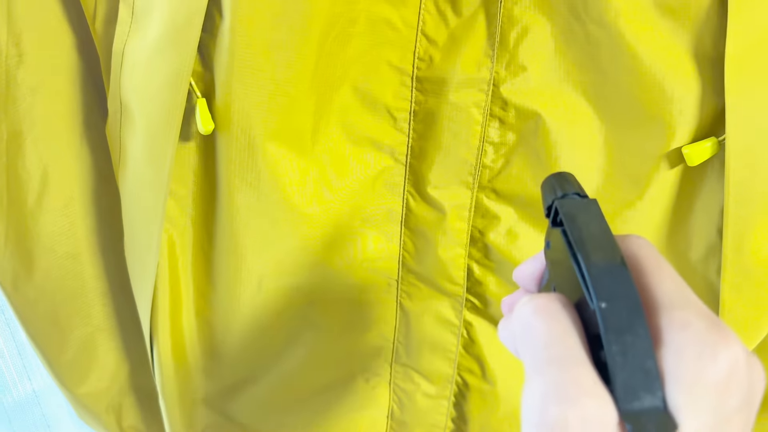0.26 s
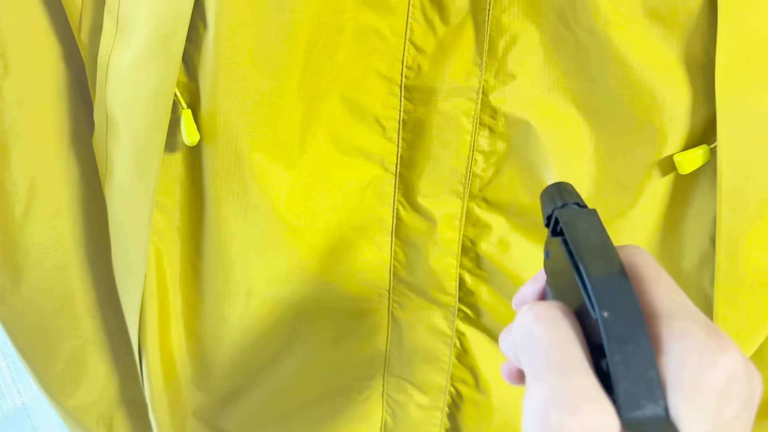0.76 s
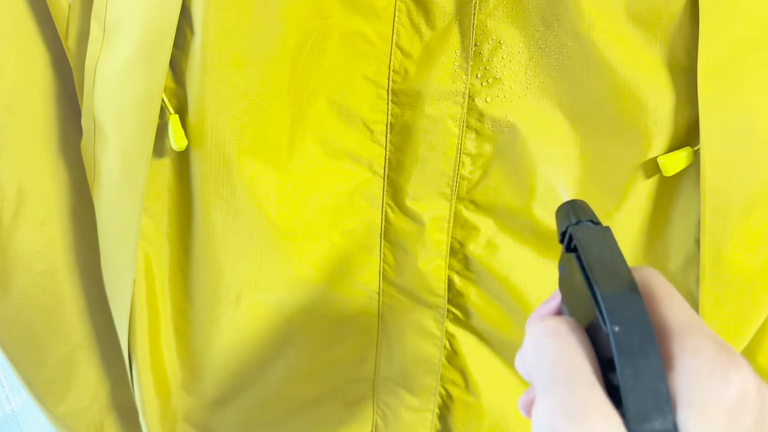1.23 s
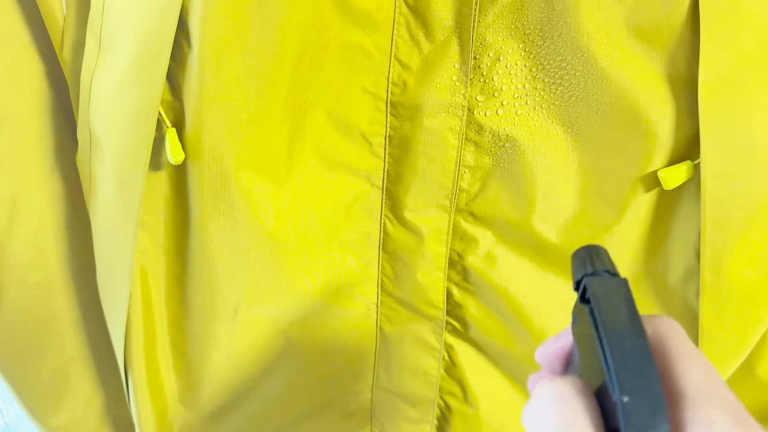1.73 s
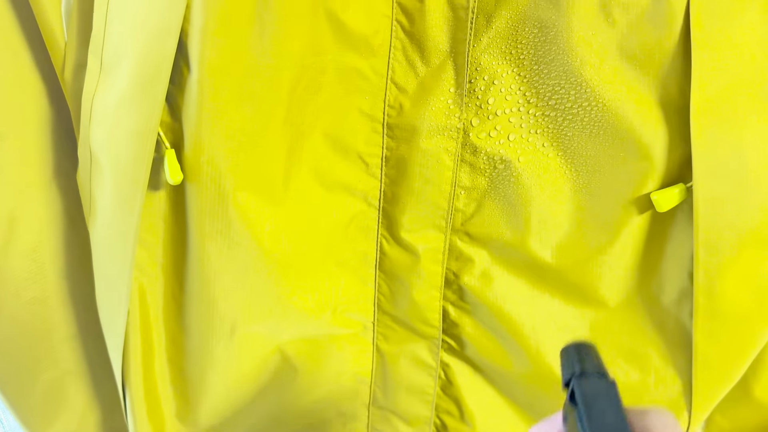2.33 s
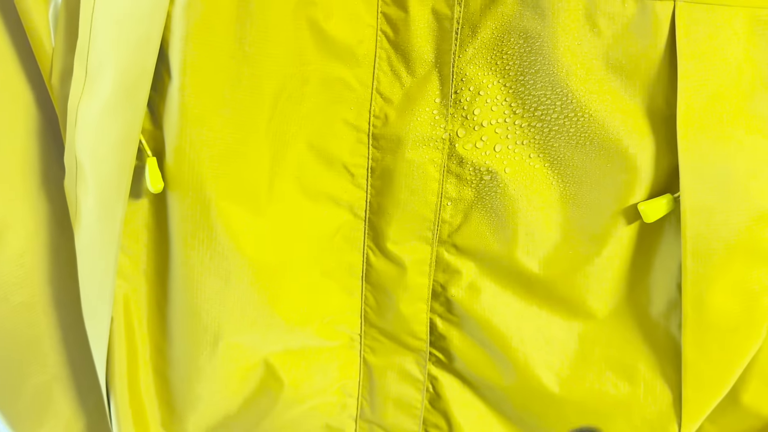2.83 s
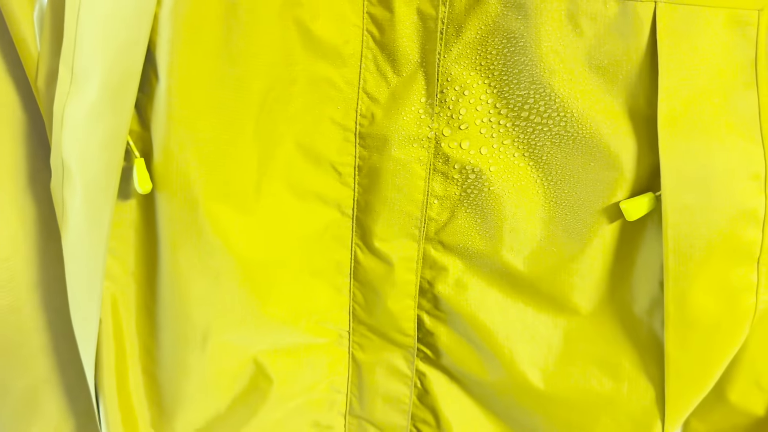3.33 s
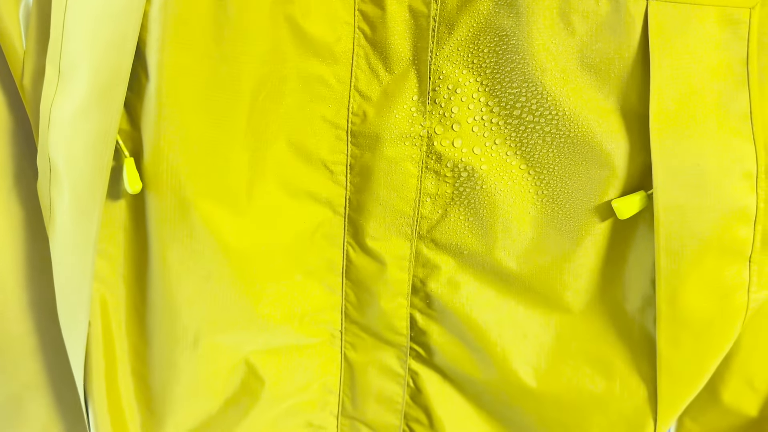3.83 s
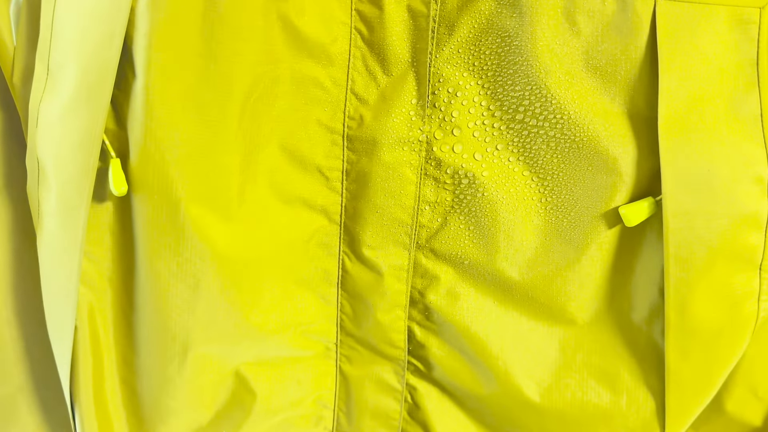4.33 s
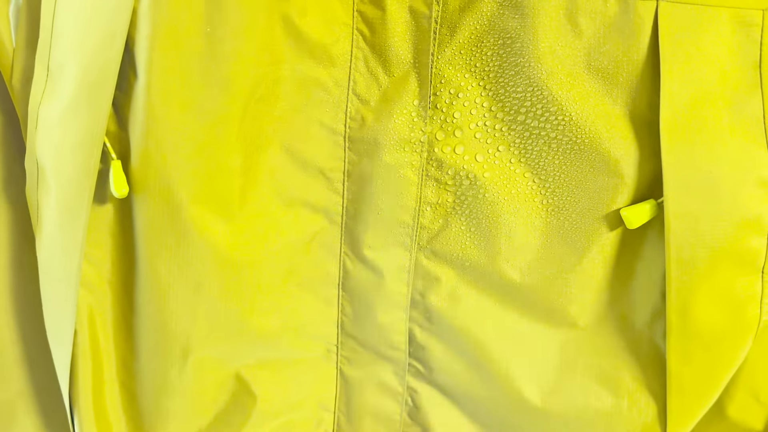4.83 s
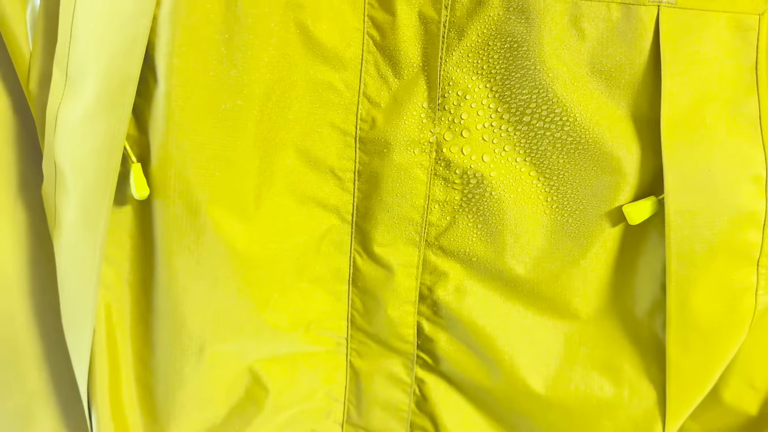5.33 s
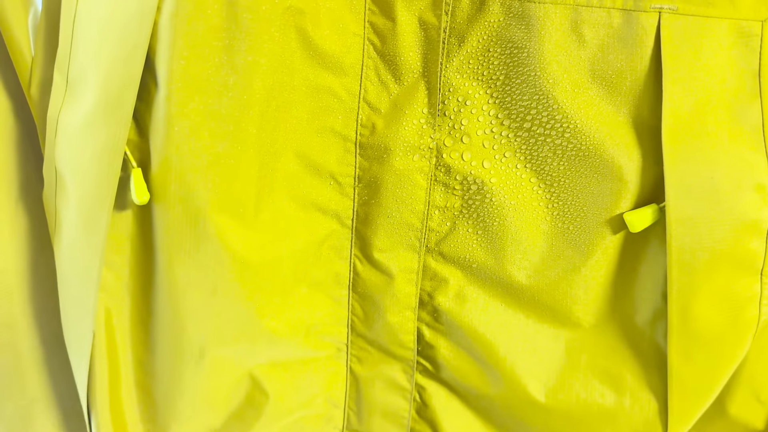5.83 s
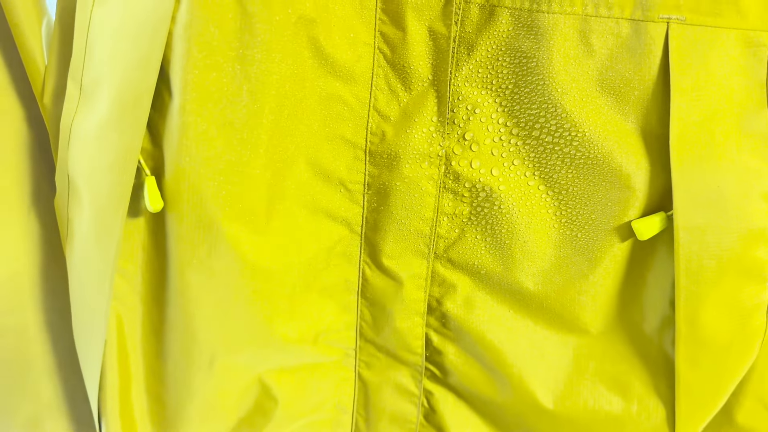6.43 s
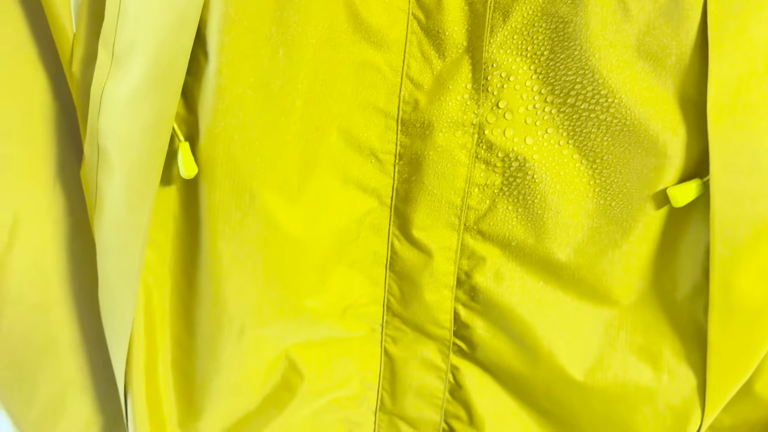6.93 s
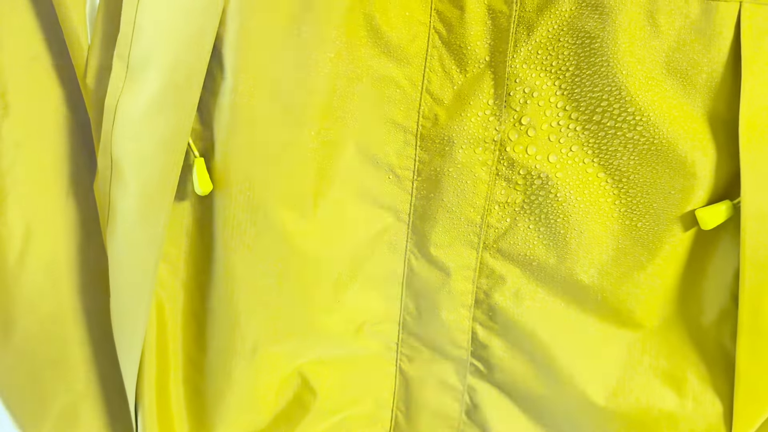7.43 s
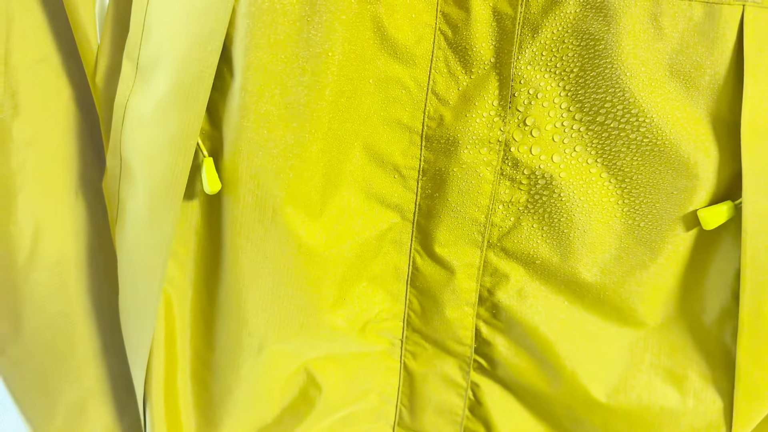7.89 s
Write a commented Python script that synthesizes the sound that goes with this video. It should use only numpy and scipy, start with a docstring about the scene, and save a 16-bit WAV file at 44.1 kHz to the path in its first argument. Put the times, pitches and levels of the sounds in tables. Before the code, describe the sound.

A plastic trigger spray bottle hisses water onto a nylon jacket in short, repeated bursts, with small clicks and pattering droplets.

```python
"""Spraying a nylon jacket

A plastic trigger sprayer is pulled eleven times over a jacket, close to a phone in a small room.
The pump clicks, the nozzle hisses and droplets patter on the cloth; after most pulls the trigger
ticks back. The first pulls sputter and spit on trapped air. A low rumble, like traffic outside,
swells towards the end, and a soft hiss rises after the ninth pull."""
import sys
import numpy as np
from scipy import signal
from scipy.fft import rfft, irfft
from scipy.io import wavfile
from scipy.ndimage import uniform_filter1d

SR = 44100
rng = np.random.default_rng(int(sys.argv[2]) if len(sys.argv) > 2 else 0)


def materialize(psi):
    """Save the field psi as 16-bit PCM at rate SR to the path in sys.argv[1].

    A 1-D psi becomes a single channel; in a 2-D psi each row is a channel.
    """
    bounded = np.clip(np.atleast_2d(psi).T, -1, 1)
    quanta = np.round(bounded * 32767).astype(np.int16)
    wavfile.write(sys.argv[1], SR, quanta)


N = 359718
TIME = np.arange(N) / SR
FREQ = np.maximum(np.arange(N // 2 + 1) * SR / N, 1)

# How the left and right microphones differ for nearby sounds.
MIC_BALANCE = [(500, 5), (1300, 3), (1850, 7.5), (2600, -1.5), (3800, 0), (5100, 4.5), (6900, 5), (7700, 8),
               (8800, 0.5), (13000, 0.1)]  # freq_hz, left_minus_right_db
MIC_LIKENESS = [(300, 0.27), (1000, 0.91), (1800, 0.68), (2400, 0.24), (2900, 0.84), (4500, 0.55),
                (6500, 0.37), (8000, 0.57), (9400, 0.97), (11000, 0.51), (13000, 0.37), (15500, 0.87)]  # freq_hz, correlation (1 means alike)
MIC_LEAD = [(300, .05), (1000, -.15), (1800, -.65), (2200, -1.4), (2500, .5), (4000, 1.1), (5200, .6),
            (6300, -.7), (7400, -3.0), (9800, -3.3), (12000, -4.3), (15500, -6.0)]  # freq_hz, left_lead_radians

# The colour of each sound, from bass to treble: freq_hz, gain_db
ROOM_COLOUR = [(25, -14.5), (42, 0), (60, 3), (100, 3.5), (280, -2), (600, -13), (850, -15.5),
               (1300, -20.5), (2200, -15), (3500, -31), (7500, -21.5), (9500, -41), (12000, -33),
               (16000, -44.5)]
HISS_COLOUR = [(400, -15), (1000, -10), (1800, 8), (3300, -5), (5000, 4), (7800, -2), (9800, -27),
               (16000, -44)]
RUMBLE_COLOUR = [(25, -24), (45, -5.5), (66, 1.5), (92, 0), (125, -5), (165, -8.5), (300, -12), (550, -19),
                 (950, -16.5), (1800, -27.5), (3400, -42.5), (7500, -43.5), (10000, -71), (16000, -55)]
TICK_COLOUR = [(150, -27), (900, -9), (3500, -11.5), (6000, -3), (7800, 4.5), (10000, 0.5), (13000, 0.5),
               (16000, -6)]
SPRAY_COLOUR = [(170, -7.5), (350, -15), (660, -17), (800, -6), (1300, -7), (2500, -8.5), (3400, -8.5),
                (5400, -2.5), (6900, -5), (8600, -3.5), (11500, 1), (14000, -1.5), (15600, -1.5)]

# Sounds that swell and fade: peak_s, relative_db, rise_s, fall_s
HOLLOW_TONE_SWELLS = [(0.9, -66, 1.2, 1.3), (5.9, -67, 1.27, 1.2)]  # a faint hollow tone in the room
HOLLOW_RUB_SWELLS = [(4.85, -51.5, 0.091, 0.098), (5.0, -57.5, 0.058, 0.067)]  # a hollow rub during the seventh pull
HISS_SWELLS = [(6.36, -43, 0.06, 0.16), (6.8, -56.5, 0.094, 0.14), (7.75, -60, 0.37, 0.62)]  # a soft hiss
HUM_SWELLS = [(4.88, -56, 0.1, 0.14), (5.63, -48.5, 0.14, 0.27), (6.15, -53, 0.096, 0.47),
              (7.42, -44, 0.088, 0.068), (7.87, -40, 0.187, 0.15)]  # a low hum outside
DRONE_SWELLS = [(5.0, -57.5, 0.11, 0.086), (6.17, -42, 0.15, 0.16), (6.45, -43, 0.11, 0.12),
                (6.8, -38, 0.057, 0.061), (7.78, -40, 0.22, 0.22), (8.1, -33, 0.19, 0.17)]  # a deep drone from the road
TYRE_SWELLS = [(7.82, -51, 0.5, 0.28)]  # the rush of tyres
GRIP_SQUEAKS = [(1.39, -53.5, 0.017, 0.028), (1.503, -54, 0.011, 0.01)]  # the hand squeaking on the phone
DROP_FLURRIES = [(0.872, -44, 0.085, 0.011), (1.528, -38.5, 0.0057, 0.012), (4.765, -32.5, 0.014, 0.017),
                 (4.855, -30, 0.021, 0.0061), (4.93, -44, 0.015, 0.019), (4.99, -51.5, 0.017, 0.044),
                 (6.097, -31.5, 0.013, 0.014)]  # heavier drops landing on the cloth

# How loud the road rumble and the idling engine are over time: time_s, relative_db
RUMBLE_LEVELS = [(0.0, -70), (0.7, -54.5), (1.25, -55), (2.05, -57), (2.65, -71), (3.2, -60), (3.7, -63),
                 (4.0, -55.5), (4.55, -62.5), (5.55, -44.5), (5.9, -48), (6.35, -44), (6.8, -44),
                 (7.05, -45), (7.5, -41.5), (8.16, -32)]
ENGINE_LEVELS = [(0, -26), (4.8, -24), (5.3, -2), (5.7, 1), (6, -2), (6.4, 2), (6.95, -3), (7.6, 2.5)]
# The tones of that engine: multiple_of_firing_rate, relative_db
ENGINE_TONES = [(1, -51), (2, -56)]
# Soft bumps of the hand that holds the phone: start_s, level_db
HAND_BUMPS = [(1.382, -34.5), (1.403, -28), (1.4198, -27.5), (1.442, -29), (1.4666, -28.5), (1.488, -34),
              (1.511, -34), (1.5272, -38)]

# Dull knocks of the sprayer's plastic head: start_s, relative_db, pitch_ratio
HEAD_KNOCKS = [(0.665, -47.5, 0.98), (0.7197, -19, 1.04), (0.7205, -27, 1.4), (0.7212, -31, 3.5),
               (1.3205, -38, 1.14), (1.768, -36.5, 1.06), (1.846, -50, 2.7), (1.884, -49, 2.45),
               (2.077, -40.5, 1), (2.402, -48.5, 3.3), (2.855, -35, 2.8), (2.857, -49.5, 1.15),
               (2.902, -38, 1), (3.479, -42, 2.35), (4.639, -38, 2.83), (4.640, -47, 1.6),
               (5.054, -41, 3.7), (5.070, -47, 2.5), (5.359, -53, 2.7), (5.711, -52, 3.6),
               (5.985, -41, 2.4), (6.215, -43, 1.08)]
# The tones of the head at a pitch ratio of 1: pitch_hz, relative_db, ring_s (time to fade by 60 dB)
HEAD_TONES = [(330, -16.5, 0.026), (745, -17, 0.019), (960, 1, 0.017), (1180, -0.5, 0.0049),
              (1550, -10, 0.009), (1915, -12, .04), (2320, -17.5, 0.02), (3260, -18.5, .03),
              (4266, -26, 0.028)]
# Sharp plastic ticks of the pump and trigger: start_s, relative_db
PLASTIC_TICKS = [(0.7203, -19), (0.929, -48), (0.961, -50), (1.433, -58), (1.474, -51.5), (1.509, -34),
                 (2.078, -40.5), (2.911, -29.5), (3.685, -37), (3.7125, -41.5), (3.7395, -36.5),
                 (4.725, -28), (4.983, -39), (5.070, -36.5)]
# The trigger catches as it springs back: start_s, relative_db, gap_s, drop_to_second_catch_db
TRIGGER_RETURNS = [(0.982, -45, 0.025, 4), (1.344, -46, 0.0093, 7), (1.746, -34.5, 0.024, 2),
                   (2.303, -28.5, .018, 1.5), (3.131, -30, .023, 6), (3.716, -32.5, .018, 5),
                   (5.053, -29.5, .016, 3), (6.226, -27, 0.032, 10.5), (7.609, -39.5, 0.019, 4.5)]
# The seal breaks loose as a pull begins: start_s, relative_db, rise_s
SEAL_SCRAPES = [(0.7193, -24, 0.0012), (1.102, -25, 0.0038), (1.497, -39.5, 0.0033), (2.081, -31.5, 0.0029),
                (2.89, -39.5, 0.0083), (3.493, -48, 0.0048), (3.501, -29, 0.0034), (4.706, -32, 0.00395),
                (5.378, -38, 0.0035), (5.999, -31.5, 0.0039), (7.318, -45, .0028), (7.934, -39.5, 0.003)]

# Short bursts from the nozzle: start_s, length_s, relative_db
WET_SPURTS = [(0.7505, 0.014, -23.5), (0.770, 0.012, -27.5), (1.103, 0.024, -30), (1.1285, 0.0057, -14.5),
              (1.173, 0.0056, -23.5), (1.183, 0.0078, -18.5), (1.635, 0.0045, -24), (1.666, 0.0047, -24.5),
              (2.109, 0.0074, -21.5), (2.151, 0.003, -15), (2.181, 0.0053, -16.5), (2.187, 0.03, -22),
              (2.225, 0.016, -27), (2.961, .004, -21.5), (3.527, 0.0064, -25), (3.624, .012, -33.5),
              (4.7695, 0.004, -17.5), (6.047, 0.0033, -21), (7.339, 0.0061, -32.5)]  # air and water
AIR_SPITS = [(0.751, 0.034, -22.5), (0.8385, 0.0025, -28), (0.8575, 0.0025, -32.5), (0.866, 0.007, -25.5),
             (1.117, 0.007, -23), (1.219, 0.004, -30), (1.2305, 0.003, -26.5)]  # air alone
# The nozzle whistles in a spit: pitch_hz, width_hz
NOZZLE_WHISTLES = [(11950, 600), (14800, 1600)]
# Peaks added to the spray's colour: pitch_hz, width_hz, boost_db (0 adds nothing)
SPRAY_PEAKS = [(900, 200, 0), (5870, 110, 0), (8050, 700, 6)]
SPURT_PEAK = (5600, 1200, 5)  # one more, as the nozzle rings in a spurt
# The tones of the taut cloth: multiple_of_ring_pitch, width_hz, relative_db
CLOTH_TONES = [(1, 209, 0.5), (1.42, 300, -4.5)]
# The trigger pulls; the cloth's drumming and ring are relative to its patter:
# start_s, build_s, push_s, fall_db_per_s, nozzle_db, patter_db, drum_db, ring_db, ring_pitch_hz
TRIGGER_PULLS = [(0.723, 0.029, 0.087, 238, -31.5, -42, -13.5, -18, 1500),
                 (1.102, 0.04, 0.079, 266, -23, -38, -17, -8.5, 1950),
                 (1.498, 0.048, 0.11, 214, -24.5, -38, -9.5, -4, 1560),
                 (2.082, 0.038, 0.12, 270, -22.5, -34.5, -15, -6.5, 1900),
                 (2.899, 0.043, 0.11, 217, -22, -33.5, -28.5, -7, 1980),
                 (3.502, 0.035, 0.084, 217, -21, -35, -26, -2, 2030),
                 (4.708, 0.073, 0.12, 201, -21, -36.5, -30, -0.5, 1820),
                 (5.379, 0.056, 0.11, 213, -23, -32, -21, -4.5, 1900),
                 (5.999, 0.045, 0.095, 232, -20, -32.5, -14, -3.5, 1790),
                 (7.321, 0.045, 0.099, 194, -23.5, -32.5, -15, -4, 1780),
                 (7.935, 0.047, 0.1, 228, -19, -32, -27, -1.5, 1800)]


def undb(db):
    """Turn decibels into a gain, a number to multiply a sound by."""
    return 10 ** (np.asarray(db) / 20)


def unit(x):
    """Scale a signal to an average (rms) level of 1."""
    return x / np.sqrt(np.mean(x ** 2))


def over_frequency(points):
    """Join rows of (freq_hz, value) into a curve, giving every octave equal room."""
    hz, value = np.transpose(points)
    return np.interp(np.log(FREQ), np.log(hz), value)


def over_time(points):
    """Join rows of (time_s, level_db) into a gain over time."""
    return undb(np.interp(TIME, *np.transpose(points)))


def swells(rows):
    """A gain that rises smoothly to each peak and then dies away."""
    gain = np.zeros(N)
    for peak_s, db, rise_s, fall_s in rows:
        since = TIME - peak_s
        gain += undb(db) * np.exp(-np.where(since < 0, (since / rise_s) ** 2, since / fall_s))
    return gain


def wander(rate_hz):
    """A smooth random drift, about 1 in size."""
    step = max(int(SR / rate_hz), 1)
    stairs = np.repeat(rng.standard_normal(N // step + 1), step)
    return unit(uniform_filter1d(stairs, step)[:N])


def noise_band(hz, width_hz):
    """Noise gathered around one pitch; the narrower, the more like a tone."""
    return unit(irfft(rfft(rng.standard_normal(N)) / (1 + ((FREQ - hz) / width_hz) ** 2), N))


def add(track, start_s, sound):
    """Mix a sound into a track."""
    i = max(int(start_s * SR), 0)
    track[..., i:i + sound.shape[-1]] += sound[..., :max(N - i, 0)]


def causal_filter(colour):
    """A filter of this colour that lets nothing sound before a click (minimum phase)."""
    cepstrum = irfft(np.log(colour + 1e-6), N)
    cepstrum[1:N // 2] *= 2
    cepstrum[N // 2 + 1:] = 0
    return np.exp(rfft(cepstrum)) / np.sqrt(np.mean(colour ** 2))


def to_stereo(paths, colour):
    """Colour a direct sound and two scattered copies and bring them to the two microphones."""
    direct, *scattered = rfft(paths)
    alike = np.clip(over_frequency(MIC_LIKENESS), .02, .98)
    side = np.array([[1], [-1]]) / 2
    lead = np.exp(1j * side * over_frequency(MIC_LEAD))
    pair = np.sqrt(alike) * direct * lead + np.sqrt(1 - alike) * np.array(scattered)
    balance = undb(side * over_frequency(MIC_BALANCE))
    return irfft(pair * causal_filter(colour) * balance / np.sqrt(np.mean(balance ** 2, axis=0)), N)


def surrounding_noise(colour, apart_hz=1400, bass_width=.15):
    """Noise from all round: the bass is alike at both microphones, the treble unrelated."""
    mid, side = rfft(rng.standard_normal((2, N)))
    width = np.hypot(FREQ, bass_width * apart_hz) / np.hypot(FREQ, apart_hz)
    pair = mid + width * side * np.array([[1], [-1]])
    return unit(irfft(pair * undb(over_frequency(colour)), N))


def room_background(steady_db=-65.5):
    """Quiet room noise, with swells of soft hiss, a hollow tone and a hollow rub."""
    tone = swells(HOLLOW_TONE_SWELLS) * noise_band(hz=305.5, width_hz=11)
    rub = swells(HOLLOW_RUB_SWELLS) * noise_band(hz=313, width_hz=30)
    steady = undb(steady_db) * surrounding_noise(ROOM_COLOUR)
    hiss = swells(HISS_SWELLS) * surrounding_noise(HISS_COLOUR)
    return steady + hiss + tone + rub


def room_echo(x, fade_s=0.21, echo_db=-17, dull_hz=8500):
    """The walls add a short, dull tail to a sound."""
    t = np.arange(SR // 2) / SR
    tail = rng.standard_normal((2, len(t))) * undb(-60 * t / fade_s) * (t > .004)
    tail = signal.sosfilt(signal.butter(2, dull_hz, fs=SR, output="sos"), tail)
    tail /= np.sqrt(np.sum(tail ** 2, axis=1, keepdims=True))
    return x + undb(echo_db) * signal.fftconvolve(x, tail, axes=1)[:, :N]


def wavering_tone(hz, waver_db=1.8, drift=.004):
    """One tone that wavers in level and pitch."""
    level = undb(waver_db * wander(11))
    pitch_hz = hz * (1 + drift * wander(9))
    return level * np.sin(2 * np.pi * np.cumsum(pitch_hz) / SR)


def traffic(firing_hz=66.45, rumble_db=-3, gust_db=4.5, gust_hz=220, drone_db=-2):
    """Through the walls come a gusty road rumble, an idling engine, a hum, a drone and tyres."""
    engine = sum(undb(db) * wavering_tone(k * firing_hz) for k, db in ENGINE_TONES)
    noise = surrounding_noise(RUMBLE_COLOUR)
    bass = irfft(rfft(noise) / (1 + (FREQ / gust_hz) ** 2), N)
    gusts = bass * (undb(gust_db * wander(10)) - 1)
    rumble = over_time(RUMBLE_LEVELS) * undb(rumble_db) * (noise + gusts)
    hum = swells(HUM_SWELLS) * wavering_tone(hz=200)
    drone = undb(drone_db) * swells(DRONE_SWELLS) * noise_band(hz=89.9, width_hz=5.1)
    tyres = swells(TYRE_SWELLS) * noise_band(hz=960, width_hz=210)
    return rumble + over_time(ENGINE_LEVELS) * engine + hum + drone + tyres


def soft_push(t, rise_s):
    """A force that grows to 1 at rise_s and then eases off."""
    return (t / rise_s) ** 2 * np.exp(2 - 2 * t / rise_s)


def hand_bumps(rise_s=0.0068, body_hz=138, rub_db=-26):
    """The grip shifts: it thumps the phone's body, and rubs and squeaks softly on it."""
    t, out = np.arange(SR // 8) / SR, np.zeros(N)
    rub = undb(rub_db) * noise_band(hz=400, width_hz=350)
    thump = np.sin(2 * np.pi * body_hz * t)
    for s, db in HAND_BUMPS:
        add(out, s, undb(db) * soft_push(t, rise_s) * (thump + rub[int(s * SR):][:len(t)]))
    return out + swells(GRIP_SQUEAKS) * noise_band(hz=870, width_hz=84)


def trigger_catches():
    """The returning trigger catches three times, fading ever faster: rows of (start_s, level_db)."""
    return [(s + k * gap_s, db - drop_db * k ** 2)
            for s, db, gap_s, drop_db in TRIGGER_RETURNS for k in range(3)]


def drip_ticks(earliest_s=.15, latest_s=.32, db=-60, spread_db=1.5):
    """Faint ticks like drips, three at random times after each pull: rows of (start_s, level_db)."""
    return [(s + rng.uniform(earliest_s, latest_s), rng.normal(db, spread_db))
            for s, *_ in TRIGGER_PULLS for _ in range(3)]


def head_knocks(push_db=-48, catch_db=-25.5, light_pitch=1.6, contact_hz=3800,
                crack_db=-3, crack_s=0.0025, crack_hz=2000, left_db=2):
    """The trigger knocks the hollow head; a harder contact is brighter and dies sooner."""
    t, out = np.arange(SR // 8) / SR, np.zeros((2, N))
    hz, db, ring_s = np.transpose(HEAD_TONES)[:, :, None]
    attack = 1 - np.exp(-t / .0005)
    # Each push and each catch also rings the head lightly.
    blows = HEAD_KNOCKS + [(s, push_db, light_pitch) for s, *_ in TRIGGER_PULLS]
    blows += [(s, level_db + catch_db, light_pitch) for s, level_db in trigger_catches()]
    chances = rng.standard_normal((len(blows), len(HEAD_TONES), 1))
    for (s, level_db, pitch), chance in zip(blows, chances):
        strength = 1 / (1 + (hz * pitch / contact_hz) ** 4)
        tones = np.sin(2 * np.pi * hz * pitch * t * (1 + 0.024 * chance) + 2 * chance)
        ring = np.sum(strength * undb(db - 60 * t * pitch / ring_s) * tones, axis=0)
        soften = signal.butter(3, crack_hz * np.sqrt(pitch), fs=SR, output="sos")
        noise = signal.sosfilt(soften, rng.standard_normal((2, len(t))))
        crack = undb(crack_db) * np.exp(-t / crack_s) * noise
        add(out, s, 2 * undb(level_db) * (ring + crack) * attack)
    return out * undb([[left_db], [0]])


def plastic_ticks(creak_db=-12, snap_db=17, rattle_db=2, rub_s=.003,
                  scatter_s=.0006, rebound=0.5, rebound_s=.002):
    """Plastic rubs, catches and lets go: a short creak, a sharp snap, a rebound and a rattle."""
    t, rubbing, snaps = np.arange(SR // 20) / SR, np.zeros(N), np.zeros((3, N))
    fade = np.exp(-t / rub_s)
    clicks = PLASTIC_TICKS + trigger_catches() + drip_ticks()
    for (s, db), chance in zip(clicks, rng.random((len(clicks), 4))):
        add(rubbing, s - t[-1], undb(db + creak_db) * fade[::-1])  # grows up to the snap
        add(rubbing, s, undb(db + rattle_db) * fade)
        snap = undb([db + snap_db])
        for path, late_s in zip(snaps, scatter_s * chance):
            add(path, s + late_s, snap)
            add(path, s + late_s + rebound_s * (1 + chance[-1]) / 2, rebound * snap)
    return to_stereo(snaps + rubbing * rng.standard_normal((3, N)), undb(over_frequency(TICK_COLOUR)))


def tiny_impacts(spread_db):
    """Noise like a dense rain of tiny hits; more spread makes their sizes more unequal."""
    size = np.repeat(undb(spread_db * rng.standard_normal(N // 8 + 1)), 8)[:N]
    return unit(rng.standard_normal((3, N)) * size)


def seal_scrapes():
    """The pump's seal breaks loose and rubs for a few milliseconds."""
    t, force = np.arange(SR // 20) / SR, np.zeros(N)
    for s, db, rise_s in SEAL_SCRAPES:
        add(force, s, undb(db) * soft_push(t, rise_s))
    return to_stereo(force * tiny_impacts(spread_db=2.6), undb(over_frequency(TICK_COLOUR)))


def jacket_echo(x, lag_s=.0021, sway=0.19, echo=0.25):
    """An echo off the jacket; its delay drifts as the hand moves, so each pull has its own colour."""
    late = TIME - lag_s * np.exp(sway * wander(1.2))
    return x + echo * np.array([np.interp(late, TIME, path) for path in x])


def spatter(x, depth_db=2.0):
    """The fan of droplets is uneven: patches about 1 kHz wide flare and fade within milliseconds."""
    cells = signal.stft(x, nperseg=256)[2]
    patches = uniform_filter1d(rng.standard_normal(cells.shape[1:]), size=6, axis=0)  # blur in pitch
    patches = uniform_filter1d(patches, size=4, axis=1)  # blur in time
    gain = unit(undb(depth_db * unit(patches)))
    return signal.istft(cells * gain, nperseg=256)[1][:, :N]


def peak(hz, width_hz):
    """A hump of height 1 around one frequency."""
    return 1 / (1 + (2 * (FREQ - hz) / width_hz) ** 2)


def spray_colour(peaks):
    """The spray's gain at each frequency, with these peaks added."""
    return undb(over_frequency(SPRAY_COLOUR) + sum(db * peak(hz, width) for hz, width, db in peaks))


def bursts(rows, flutter_db=2.5):
    """A gain that opens in abrupt, fluttering bursts."""
    gain = np.zeros(N)
    for s, length_s, db in rows:
        add(gain, s, undb(db) * signal.windows.tukey(int(length_s * SR), .3))
    return gain * unit(undb(flutter_db * wander(600)))


def sputter(treble):
    """Trapped air breaks the jet into spurts that ring the nozzle; air alone spits, thin and high."""
    water = jacket_echo(spatter(bursts(WET_SPURTS) * tiny_impacts(spread_db=0.98)))
    spurts = to_stereo(water, spray_colour(SPRAY_PEAKS + [SPURT_PEAK]) * treble)
    air = spatter(bursts(AIR_SPITS) * rng.standard_normal((3, N)))
    whistle = sum(peak(hz, width) for hz, width in NOZZLE_WHISTLES)
    return spurts + to_stereo(air, whistle)


def cloth_ring(ring_hz, width_hz):
    """Droplets keep one tone of the taut cloth ringing; its pitch depends on the spot each pull hits."""
    narrow = 1 + (FREQ / width_hz) ** 2
    a, b = (unit(irfft(rfft(tiny_impacts(spread_db=4.5)) / narrow, N)) for _ in range(2))
    phase = 2 * np.pi * np.cumsum(ring_hz) / SR
    return a * np.cos(phase) + b * np.sin(phase)  # moves the slow noise up to the pitch


def cloth_patter(level, ragged, colour, low_cut_hz=380, heavy_db=-6, heavy_per_s=260):
    """Fine droplets rain on the cloth; a ragged jet adds heavier drops, each a separate click."""
    fine = tiny_impacts(spread_db=3.5)
    heavy = unit((rng.random((3, N)) < heavy_per_s / SR) * rng.standard_normal((3, N)))
    rain = level * (fine + undb(heavy_db) * ragged * heavy)
    low_cut = FREQ ** 2 / (FREQ ** 2 + low_cut_hz ** 2)
    return to_stereo(jacket_echo(spatter(rain)), colour * low_cut)


def nozzle_mist(jet, fineness, colour, top_hz=11000):
    """The jet tears into a hissing mist; a finer mist is brighter at the very top."""
    mist = to_stereo(jacket_echo(spatter(jet * tiny_impacts(spread_db=0))), colour)
    top = irfft(rfft(mist) * FREQ ** 8 / (FREQ ** 8 + top_hz ** 8), N)
    return mist + fineness * top


def pump_strokes(build_power=1.5, patter_fall_ratio=1.23, settle_db=-44, settle_s=0.12,
                 ragged_after_s=0.15, full_flow_db=-25, fine_share=0.44):
    """Curves that steer the spray: in each pull the pressure builds, holds and runs out."""
    t = np.arange(SR // 2) / SR
    jet, fineness, patter, drum, ring, ring_hz, ragged = np.zeros((7, N))
    for s, build_s, push_s, fall_db_per_s, nozzle_db, patter_db, drum_db, ring_db, hz in TRIGGER_PULLS:
        pressure = np.minimum(t / build_s, 1) ** build_power
        spent_s = np.maximum(t - push_s, 0)
        fall_db = fall_db_per_s * spent_s
        settling = undb(settle_db) * np.exp(-(spent_s / settle_s) ** 2)  # the last mist comes down
        landing = pressure * np.hypot(undb(patter_db - patter_fall_ratio * fall_db), settling)
        add(jet, s, pressure * undb(nozzle_db - fall_db))
        add(patter, s, landing)
        add(drum, s, undb(drum_db) * landing)
        add(ring, s, undb(ring_db) * landing)
        add(ragged, s, np.clip(t / ragged_after_s - 1, 0, 1))  # the jet breaks up as pressure runs out
        # A weaker jet makes a finer mist.
        fineness[int(s * SR):] = undb(fine_share * (full_flow_db - nozzle_db)) - 1
        ring_hz[int(s * SR):] = hz
    return jet, fineness, patter, drum, ring, ring_hz, ragged


def spray(split_hz=2900, flutter_db=1.0, splash_db=0.5, ragged_db=2.55):
    """The nozzle hisses in the treble; lower down, droplets patter on cloth that drums and rings."""
    jet, fineness, patter_gain, drum_gain, ring_gain, ring_hz, ragged = pump_strokes()
    colour = spray_colour(SPRAY_PEAKS)
    slope = (FREQ / split_hz) ** 3
    bass, treble = 1 / np.hypot(1, slope), slope / np.hypot(1, slope)
    flutter = undb((flutter_db + ragged_db * ragged) * wander(260))
    mist = nozzle_mist(jet * flutter, fineness, colour * treble)
    splash = undb((splash_db + ragged_db * ragged) * wander(120))
    landing = np.hypot(patter_gain, swells(DROP_FLURRIES))
    patter = cloth_patter(landing * splash, ragged, colour * bass)
    tones = sum(undb(db) * cloth_ring(k * ring_hz, width) for k, width, db in CLOTH_TONES)
    ring = to_stereo(ring_gain * splash * tones, np.ones_like(FREQ))
    drumming = drum_gain * noise_band(hz=320, width_hz=160)
    return mist + sputter(treble) + patter + ring + drumming


def scene(lean_db=.85):
    """The sprayer in its room, over a quiet background that is a little louder on the left."""
    sprayer = room_echo(spray() + seal_scrapes() + plastic_ticks() + head_knocks())
    background = traffic() + room_background() + hand_bumps()
    return sprayer + undb([[lean_db], [-lean_db]]) * background


def record(dry, top_hz=15750):
    """The phone steeply cuts the highest treble."""
    return signal.sosfilt(signal.ellip(10, .2, 70, top_hz, fs=SR, output="sos"), dry)


dry = scene()
out = record(dry)
materialize(out)
```